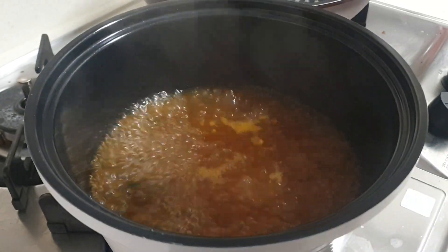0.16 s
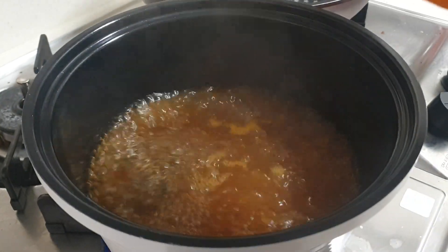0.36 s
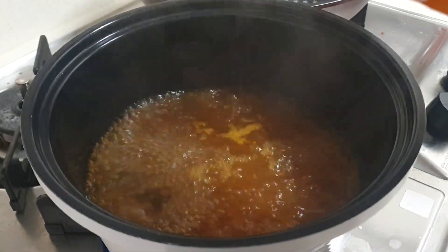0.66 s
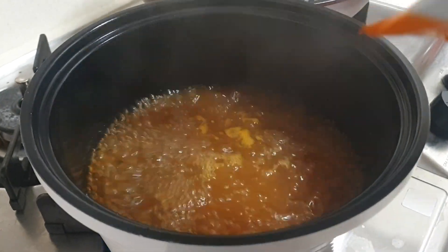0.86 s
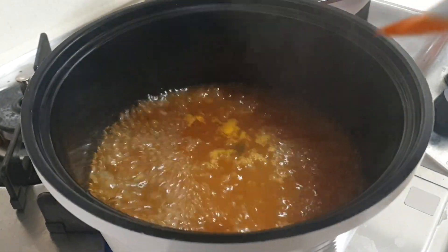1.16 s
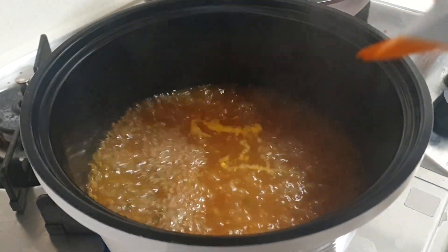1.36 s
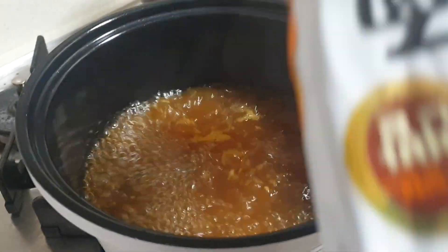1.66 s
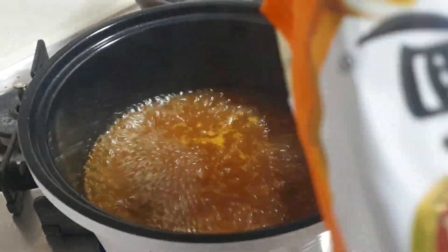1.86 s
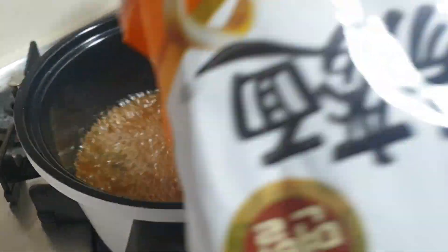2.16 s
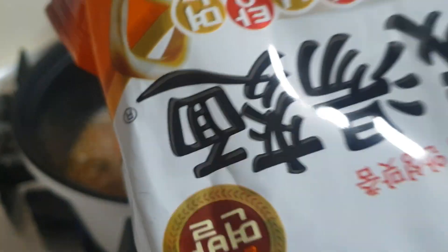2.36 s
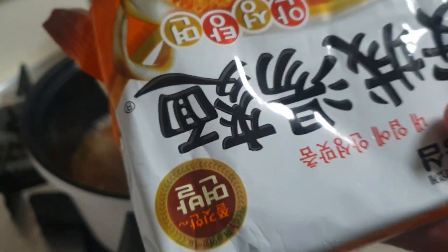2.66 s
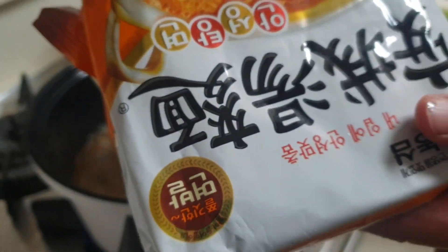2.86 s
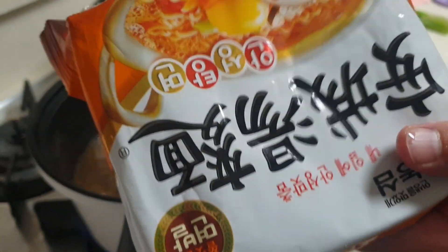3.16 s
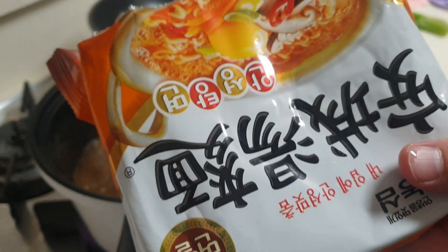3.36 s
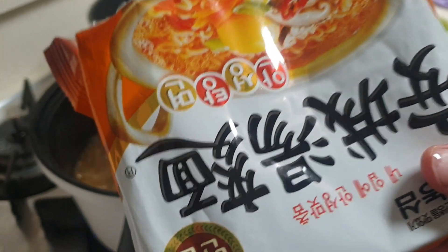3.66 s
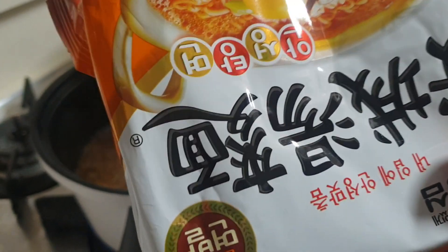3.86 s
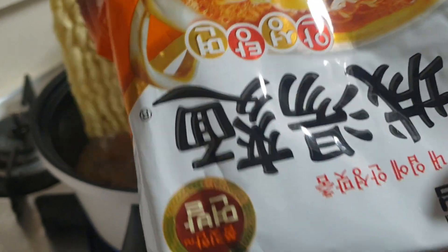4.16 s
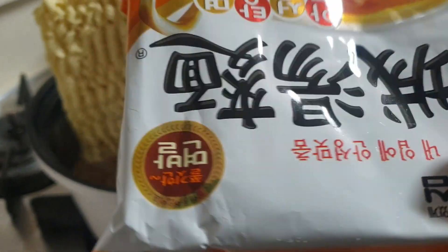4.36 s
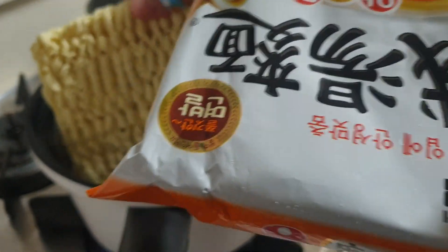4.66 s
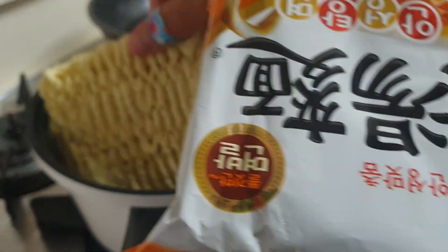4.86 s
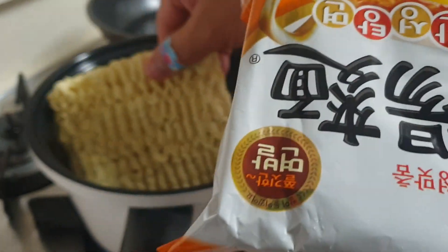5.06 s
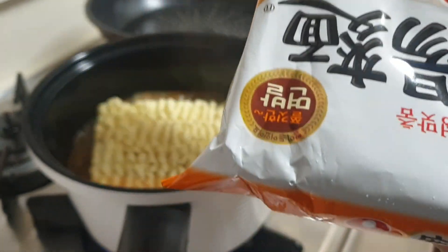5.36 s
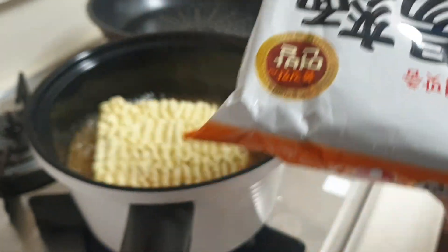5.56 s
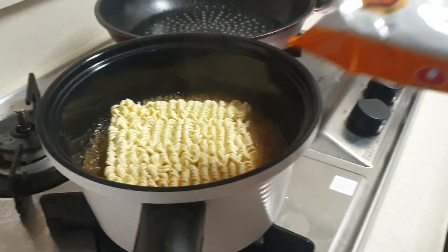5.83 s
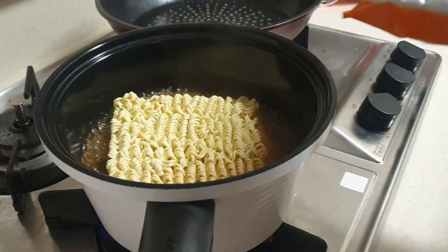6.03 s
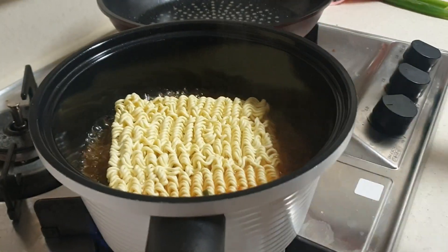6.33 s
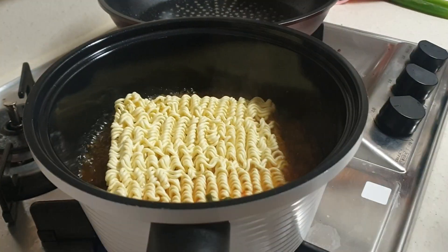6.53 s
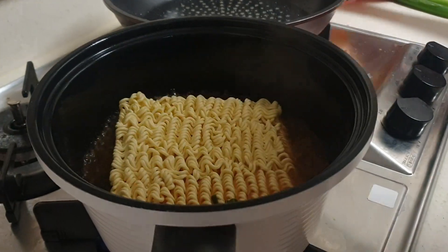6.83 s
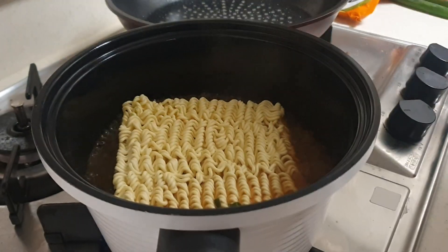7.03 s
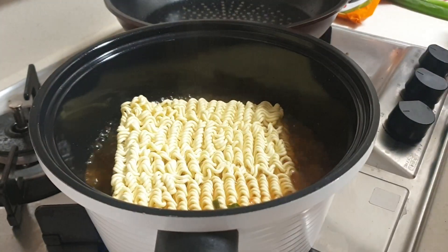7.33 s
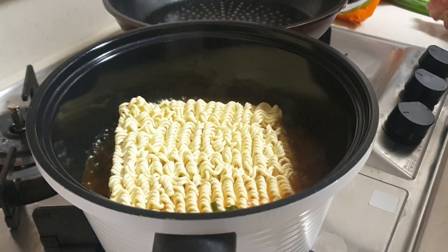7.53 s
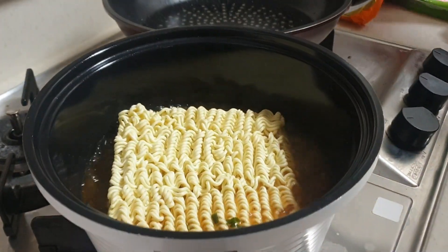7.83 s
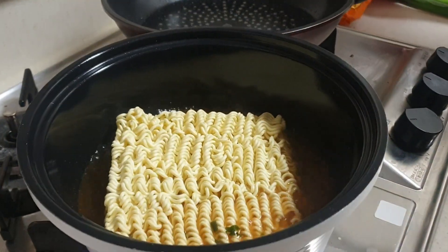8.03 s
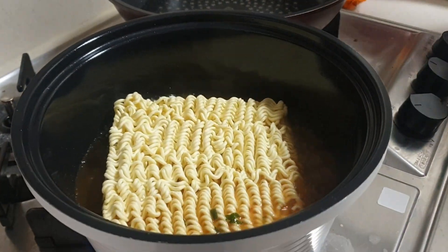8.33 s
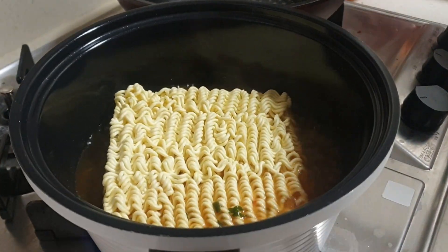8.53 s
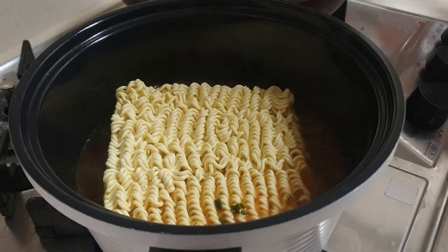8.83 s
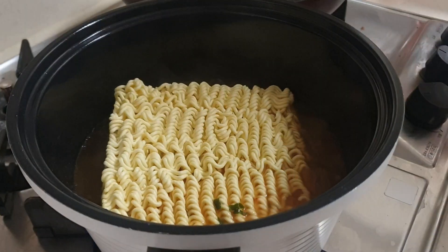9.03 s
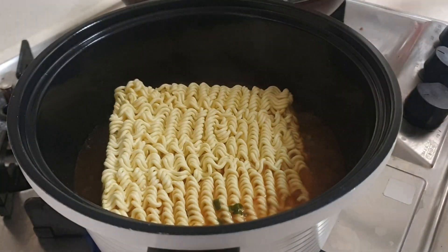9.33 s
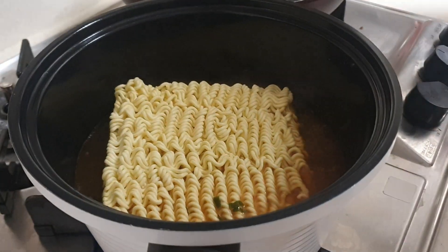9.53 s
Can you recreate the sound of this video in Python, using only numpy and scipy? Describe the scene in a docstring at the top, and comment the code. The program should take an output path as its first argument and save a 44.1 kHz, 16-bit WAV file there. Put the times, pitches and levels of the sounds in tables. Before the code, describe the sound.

A plastic noodle packet crinkles and snaps close up over simmering broth, then dry noodles drop into the pot with a soft scrape.

```python
"""A plastic noodle packet snaps, rustles and flexes as it is pulled open right at the microphone.
Behind it broth simmers over the rumble and hiss of a gas flame. The dry noodle block scrapes into
the pot and bubbles pop around it; then the packet is put down and handled further off on the worktop.
A small, hard kitchen rings after the packet and the pot."""
import sys
import numpy as np
from scipy import signal
from scipy.fft import rfft, irfft, next_fast_len
from scipy.io import wavfile
from scipy.ndimage import uniform_filter1d

SR = 44100
rng = np.random.default_rng(int(sys.argv[2]) if len(sys.argv) > 2 else 0)


def waveform_to_disk(signal):
    """Save audio, clipped to [-1, 1], as 16-bit WAV at the path in sys.argv[1]."""
    frames = np.transpose(np.atleast_2d(signal))
    scaled = np.clip(frames, -1, 1) * 32767
    samples = np.round(scaled).astype(np.int16)
    wavfile.write(sys.argv[1], SR, samples)


N = 427329
TIME = np.arange(N) / SR


def undb(db):
    """Decibels to gain."""
    return 10 ** (np.asarray(db) / 20)


def unit(x):
    """Scale to rms 1."""
    return x / np.sqrt(np.mean(x ** 2))


def band(x, lo_hz, hi_hz):
    """Causal band-pass."""
    sos = signal.butter(3, [lo_hz, min(hi_hz, .45 * SR)], "band", fs=SR, output="sos")
    return signal.sosfilt(sos, x)


def eq(x, points):
    """Filter by a curve of (frequency [Hz], gain [dB]) points."""
    hz, db = np.transpose(points)
    size = next_fast_len(N + 4096)
    bins_hz = np.maximum(np.fft.rfftfreq(size, 1 / SR), 1)
    gain = undb(np.interp(np.log(bins_hz), np.log(hz), db))
    return irfft(rfft(x, size) * gain, size)[..., :N]


def resonance(x, hz, q):
    """One resonance, gain 1 at its centre."""
    return signal.lfilter(*signal.iirpeak(min(hz, SR / 3), max(q, 1), fs=SR), x)


def mode_pole(hz, t60):
    """Pole of a mode that dies by 60 dB in t60 seconds."""
    return np.exp((2j * np.pi * hz - np.log(1000) / t60) / SR)


def add(out, s, x):
    """Mix x in at time s."""
    i = max(int(s * SR), 0)
    out[..., i:i + x.shape[-1]] += x[..., :N - i]


def pan(db):
    """Constant-power gains; every pan here is left minus right in dB."""
    return unit(undb([[db / 2], [-db / 2]]))


def stereo(three, likeness):
    """Left and right from one shared and two separate signals."""
    return np.sqrt(likeness) * three[0] + np.sqrt(1 - likeness) * three[1:]


def noise(samples, likeness):
    """Stereo white noise, from wide (likeness 0) to mono (1)."""
    return stereo(rng.standard_normal((3, samples)), likeness)


def drift(rate):
    """Random wander with a spread near 1 and `rate` turns a second."""
    knots = rng.standard_normal(int(N / SR * rate) + 2)
    return np.interp(TIME * rate, np.arange(len(knots)), knots)


def grains(rate, spread_db, decay_s):
    """Envelope of many tiny bursts: mostly weak, a few strong."""
    sizes = undb(spread_db * np.minimum(rng.exponential(size=N), 4.5))
    hits = (rng.random(N) < rate / SR) * sizes ** 2
    power = signal.lfilter([1], [1, -np.exp(-2 / (decay_s * SR))], hits)
    return unit(np.sqrt(power + 1e-12))


def registers(x):
    """Body, crack and sparkle of a crisp sound; body and brightness are set against the crack band."""
    return band(x, 330, 1500), band(x, 1500, 6000), band(x, 6000, 17000)


# Tone of the flame: (frequency [Hz], gain [dB])
FLAME_EQ = [(20, -23), (45, 6.5), (90, -0.5), (210, -8), (380, -16.5), (620, -15.5), (1000, -19.5),
            (1350, -25.5), (2200, -18.5), (3200, -34.5), (7000, -26), (10000, -24), (16000, -19)]
# Thin whistles of the gas jet: (frequency [Hz], level [dB])
JET_WHISTLES = [(8550, -72), (9950, -69.5)]
# Low hum: (frequency [Hz], starting level [dB])
LOW_HUM = [(44.8, -67.5)]

def stove(flame_db, hiss_pan_db, hum_rise_db_per_s):
    """The gas flame rumbles, hisses and faintly whistles over a low hum that wavers and grows."""
    flame = unit(eq(rng.standard_normal((3, N)), FLAME_EQ)) * undb(flame_db + .5 * drift(3.49))
    rumble = band(stereo(flame, 0.88), 35, 340)
    hiss = band(stereo(flame, 0.11), 410, 13200) * pan(hiss_pan_db)
    hum = whistle = 0
    for hz, db in LOW_HUM:
        swell = undb(db + hum_rise_db_per_s * TIME + 2 * drift(1.8))
        hum += np.sqrt(2) * swell * np.sin(2 * np.pi * hz * TIME + drift(1.7))
    for hz, db in JET_WHISTLES:
        whistle += undb(db + drift(2.16)) * unit(resonance(rng.standard_normal((2, N)), hz, q=64))
    return rumble + hiss + hum + whistle


# Reverb time of the kitchen: (frequency [Hz], t60 [s])
KITCHEN_DECAY = [(500, 0.27), (4000, 0.32), (16000, 0.21)]

def reflections(predelay_s):
    """Dense echoes off tiles and worktop, dying soonest in the top treble."""
    t = np.arange(SR // 2) / SR
    hz, t60 = np.transpose(KITCHEN_DECAY)
    edges_hz = np.geomspace(50, 18000, 10)
    tail = 0
    for lo, hi in zip(edges_hz, edges_hz[1:]):
        band_t60 = np.interp(np.log(lo * hi) / 2, np.log(hz), t60)
        wash = noise(len(t), likeness=1 / (1 + (lo / 600) ** 2))
        tail += band(wash, lo, hi) * np.exp(-np.log(1000) * t / band_t60)
    return unit(tail * np.clip(t / predelay_s - 1, 0, 1)) / np.sqrt(len(t))


def kitchen(x, predelay_s, sets):
    """Hands and microphone keep moving, so the sound passes through sets of reflections in turn."""
    active = (TIME * 10).astype(int) % sets
    room = 0
    for k in range(sets):
        crossfade = np.sqrt(np.abs(uniform_filter1d(1. * (active == k), SR // 20)) / 2)
        send = x.sum(axis=0) * crossfade
        room += signal.oaconvolve(send[None], reflections(predelay_s), axes=1)[:, :N]
    return room


# Tone of the fizz: (frequency [Hz], gain [dB])
FIZZ_EQ = [(400, 3), (900, -2.5), (2200, -1.5), (4000, -7), (7500, -13.5), (10200, 3.5), (13000, 1),
           (16000, -2)]
# Level of the simmer, swelling as the block goes in: (time [s], level [dB])
SIMMER_LEVEL = [(0, -46.5), (5.3, -67), (5.75, -55), (5.88, -43.5), (6.35, -55), (8.3, -56), (9.69, -51)]

def broth(rate, spread_db, bubble_db):
    """Tiny steam bubbles fizz at the hot wall; larger ones ring for a few cycles as they burst."""
    fizz = unit(eq(noise(N, 0.059) * grains(rate, spread_db, 0.0019), FIZZ_EQ))
    bubbles, t = np.zeros((2, N)), np.arange(SR // 50) / SR
    for when, pitch, strength in rng.random((700, 3)):
        cycles = 1100 * 5 ** pitch * t
        ping = np.sin(2 * np.pi * cycles) * np.exp(-cycles / 2)
        add(bubbles, when * N / SR, ping * undb(19 * strength ** 2))
    simmer_db = np.interp(TIME, *np.transpose(SIMMER_LEVEL))
    return (fizz + undb(bubble_db) * unit(bubbles)) * undb(simmer_db + drift(21))


def cracks(rows, crack_s, flutter_s, flutter_db, ring_db, span_s, likeness, stiffness, q):
    """A sharp release and a short flutter ring one facet; each level is an rms over span_s."""
    out, t = np.zeros((2, N)), np.arange(SR // 10) / SR
    jolt = undb(19.5) * (t == 0)
    for s, db, body_db, bright_db, facet_hz, pan_db in rows:
        ragged = undb(4.9 * np.interp(t, t[::50], rng.standard_normal(len(t[::50]))))
        # bright cracks come from small, stiff facets that hardly flutter
        flutter = undb(flutter_db - stiffness * bright_db) * ragged * np.exp(-t / flutter_s)
        burst = noise(len(t), likeness) * (np.exp(-t / crack_s) + flutter)
        ring = resonance(burst + jolt, facet_hz, q)
        # a facet radiates little far below its own pitch
        parts = registers(band(burst, facet_hz / 4, SR) + undb(ring_db) * ring)
        sound = sum(undb(part_db) * part / np.sqrt(np.sum(part ** 2) / (2 * span_s * SR))
                    for part, part_db in zip(parts, (body_db, 0, bright_db)))
        add(out, s, undb(db) * pan(pan_db) * sound)
    return out


def pitched(rows, base_hz=1680, db_per_octave=14.5):
    """Give each knock or pop a pitch that falls as its body grows."""
    rows = np.array(rows)
    return np.insert(rows, -1, base_hz * 2 ** (-rows[:, 2] / db_per_octave), axis=1)


# Bubble pops: (time [s], level [dB], body [dB], brightness [dB], pan [dB])
BUBBLE_POPS = [(5.7354, -52.5, -7, -15, 8), (5.8018, -60, 9.5, 9, 9), (5.8552, -58, 0, 12, -18),
               (6.1293, -48.5, -8.5, -2, -1)]

def pops():
    """Bubbles burst around the noodle block, each with a brief ring."""
    return cracks(pitched(BUBBLE_POPS), crack_s=0.00055, flutter_s=0.0054, flutter_db=1, ring_db=8,
                  span_s=0.013, likeness=0.21, stiffness=0.48, q=1.6)


# Ring of the filled pot: (frequency [Hz], level [dB], t60 [s])
POT_MODES = [(104, 5, 0.23), (167, 3, 0.054), (211, 3.5, 0.065), (534, -4, 0.027), (690, -9, 0.051)]
# The block meets the pot: (time [s], relative level [dB], rise [s], decay [s], relative scrape [dB])
BLOCK_TOUCHES = [(5.03, -53, 0.0016, 0.014, -46), (5.358, -37.5, .009, 0.016, 13.5)]

def noodle_block():
    """The dry block scrapes on the wall and shakes the pot; a soft touch wakes only the low modes."""
    out, t = np.zeros((2, N)), np.arange(SR // 2) / SR
    for s, db, rise_s, decay_s, scrape_db in BLOCK_TOUCHES:
        lead_s = 4 * rise_s
        since_peak = t - lead_s
        push = noise(len(t), 0.72) * np.exp(-np.maximum(-since_peak / rise_s, since_peak / decay_s))
        scrape = unit(band(push, 160, 4000) + undb(4.5) * band(push, 6100, 15000))
        sound = undb(scrape_db - 5.5) * scrape * pan(20)
        for hz, mode_db, t60 in POT_MODES:
            ring = signal.lfilter([1], [1, -mode_pole(hz, t60)], push).real
            hardness_db = scrape_db * np.clip(np.log(hz / 200) / 2, 0, 1)
            sound += undb(mode_db + hardness_db) * unit(ring)
        add(out, s - lead_s, undb(db - 8) * unit(sound))
    return out


def shifting_facets(x, depth_db, rate):
    """Facets of ever new sizes take over: each half octave swells and fades on its own."""
    size = next_fast_len(N)
    half_octave = 2 * np.log2(np.clip(np.fft.rfftfreq(size, 1 / SR) / 500, 1, 32))
    spectrum, out = rfft(x, size), 0
    for k in range(int(half_octave.max()) + 1):
        window = np.maximum(1 - abs(half_octave - k), 0)
        out += irfft(spectrum * window, size)[:, :N] * undb(depth_db * drift(rate))
    return out


# Film slides over film: (start [s], length [s], relative level [dB], brightness [dB])
FILM_PULLS = [(0.051, 0.073, -42.5, -7), (0.181, .11, -49, 3), (0.378, 0.032, -50, 3.5),
              (0.535, 0.17, -42, -0.5), (0.736, 0.16, -42, -0.5), (0.911, 0.16, -41.5, 6),
              (1.086, 0.11, -55.5, 11), (1.212, 0.076, -38, -1), (1.417, 0.063, -42, 0.5),
              (1.482, 0.046, -40.5, -2), (1.592, 0.094, -42, 2), (1.739, 0.29, -49.5, -0.5),
              (2.106, 0.091, -46, -2), (2.217, 0.2, -50.5, -4), (2.509, .34, -50, 5.5),
              (3.027, 0.047, -52.5, 3.5), (3.11, 0.048, -50.5, 3), (6.895, 0.053, -48, 2.5),
              (7.96, 0.033, -59, -5), (8.456, 0.093, -59, 2), (8.58, 0.029, -60, -13),
              (9.04, 0.077, -56.5, -10), (9.213, 0.027, -43, 1.5), (9.287, 0.021, -43.5, 3.5),
              (9.423, 0.039, -52.5, 0.5), (9.54, 0.12, -55.5, -2.5)]
PUT_DOWN_S, HAND_ATTACK_S = 6.4, 0.02
HAND_PULLS = [pull for pull in FILM_PULLS if pull[0] < PUT_DOWN_S]
WORKTOP_PULLS = [pull for pull in FILM_PULLS if pull[0] >= PUT_DOWN_S]

def pull_envelopes(pulls, attack_s, release_s=0.04):
    """Strength of crack and sparkle as the film takes up speed, holds and slides to rest."""
    crack, sparkle = np.full((2, N), 1e-14)
    t = np.arange(SR) / SR
    for s, length_s, db, bright_db in pulls:
        release = np.exp(-np.maximum(t - length_s, 0) / release_s)
        power = (undb(db) * np.clip(t / attack_s, 0, 1) * release) ** 2
        add(crack, s, power)
        add(sparkle, s, power * undb(bright_db) ** 2)
    return np.sqrt(crack), np.sqrt(sparkle)


def rustle(pulls, rate, spread_db, body_db, attack_s):
    """Countless small creases give way as the film slides."""
    crack, sparkle = pull_envelopes(pulls, attack_s)
    creases = noise(N, 0.08) * grains(rate, spread_db, 0.0033)
    parts = registers(shifting_facets(creases, depth_db=2, rate=65))
    return sum(unit(part) * gain for part, gain in zip(parts, (crack * undb(body_db), crack, sparkle)))


# Colour given to the packet's sounds: (frequency [Hz], gain [dB])
FILM_EQ = [(300, 3.5), (1500, 1.5), (2800, 3.5), (4500, 1), (7500, -2.5), (10000, 5), (13000, 3.5),
           (16000, -2)]

def film_tone(x):
    """Colours the packet's sounds, near or far."""
    return eq(x, FILM_EQ)


# Ring of the worktop: (frequency [Hz], gain [dB], t60 [s])
WORKTOP_MODES = [(560, 3, 0.031), (900, -3, 0.033), (1500, -6, 0.045)]

def worktop(knocks):
    """The worktop answers a knock with a few short, hollow modes."""
    out = 0
    for hz, db, t60 in WORKTOP_MODES:
        pole = mode_pole(hz, t60)
        out += undb(db) * 2 * (1 - abs(pole)) * signal.lfilter([1], [1, -pole], knocks).real
    return out


# Packet knocks, before EQ: (time [s], level [dB], body [dB], brightness [dB], pan [dB])
PACKET_KNOCKS = [(6.475, -57, -10, -8, 13), (6.9069, -56.5, 8.5, -7, 4), (6.9399, -34, -4.5, 7.5, 4),
                 (7.081, -45.5, -2.5, 1.5, -2), (7.4051, -47.5, -1, 1, -3), (7.4172, -53, 7.5, -10, 14),
                 (7.4722, -51, 5, 8.5, -8), (7.5422, -40, -1, -2, 13), (7.552, -44.5, 4, 2, 13),
                 (7.8696, -50, -6, 0, 0), (8.5855, -45.5, -1.5, -4, -5), (8.868, -58, -6, 6, 8),
                 (8.9807, -50, -5.5, 4, 1), (9.0322, -47.5, -4.5, 11.5, -3), (9.098, -51.5, -1.5, 5, 13),
                 (9.546, -46.5, -2.5, -2, -2)]

def packet_on_worktop():
    """Further off, the packet knocks on the worktop and rustles as it is handled."""
    knocks = cracks(pitched(PACKET_KNOCKS), crack_s=0.0061, flutter_s=0.0098, flutter_db=-16, ring_db=0,
                    span_s=0.0065, likeness=0.11, stiffness=0, q=1.55)
    slides = rustle(WORKTOP_PULLS, rate=1100, spread_db=4.5, body_db=-8, attack_s=0.022)
    return film_tone(knocks + worktop(knocks) + undb(-1) * slides)


# Whole panels flip over or meet the worktop: (time [s], level [dB], pitch [Hz])
PANEL_THUDS = [(0.078, -48.5, 120), (0.247, -53, 169), (0.762, -46.5, 125), (0.845, -45, 199),
               (1.003, -51.5, 198), (1.233, -47.5, 190), (1.269, -49, 120), (1.288, -47, 99),
               (2.113, -52, 210), (2.334, -51.5, 327), (6.94, -51.5, 300), (7.404, -54, 110),
               (7.545, -53.5, 260)]

def panel_flexes(pulls, decay_s, sway_db):
    """Large panels push air in soft thuds, and keep swaying while the film is worked."""
    thuds, t = np.zeros((2, N)), np.arange(SR // 6) / SR
    for s, db, hz in PANEL_THUDS:
        thud = band(noise(len(t), 0.73) * np.exp(-t / decay_s), hz / 1.9, hz * 1.77)
        add(thuds, s, undb(db) * unit(thud))
    sway = unit(band(noise(N, 0.48) * grains(70, 2.3, 0.0039), 55, 274))
    effort, _ = pull_envelopes(pulls, HAND_ATTACK_S)
    return thuds + sway * np.sqrt(effort) * undb(sway_db)


# Squeaks: (time [s], length [s], start pitch [Hz], end pitch [Hz], level [dB], roughness [0-1])
FILM_SQUEAKS = [(1.165, .032, 10800, 11900, -35, .02), (.89, .065, 670, 650, -42, .06)]

def squeaks():
    """Taut film slips in short, unsteady tones."""
    out = np.zeros((2, N))
    for s, length_s, start_hz, end_hz, db, rough in FILM_SQUEAKS:
        progress = np.linspace(0, 1, int(length_s * SR))
        jitter = unit(uniform_filter1d(rng.standard_normal(len(progress)), 40))
        hz = (start_hz + (end_hz - start_hz) * progress) * (1 + rough * jitter)
        add(out, s, undb(db) * np.sin(np.pi * progress) * np.sin(2 * np.pi * np.cumsum(hz) / SR))
    return out


def crinkles(pulls, count, spread_db, offset_db):
    """Stray small cracks, each with its own colour, as strong as its pull; rows as in FILM_SNAPS."""
    s, length_s, db, bright_db = np.transpose(pulls)
    moment, strength, size, sheen, turn = rng.random((count, 5)).T
    # longer pulls get more cracks
    pull = np.searchsorted(np.cumsum(length_s) / length_s.sum(), (np.arange(count) + turn) / count)
    when = s[pull] + HAND_ATTACK_S / 2 + moment * length_s[pull]
    level_db = db[pull] + offset_db + spread_db * strength ** 2
    body_db, facet_hz = -14 * (1 - size), 4500 * 2 ** (-2 * size)
    return np.column_stack([when, level_db, body_db, bright_db[pull] + 10 * (sheen - .5), facet_hz])


# Where the packet is held: (time [s], pan [dB])
HAND_PAN = [(0, -8), (1.3, -4), (1.5, -0.5), (2.1, 3.5), (2.6, 2.5), (3.4, 2), (4.5, 0), (6.2, -2.5)]

def panned(rows, scatter_db):
    """Give each crack a pan, scattered around where the packet is held."""
    held_db = np.interp(rows[:, 0], *np.transpose(HAND_PAN))
    return np.column_stack([rows, held_db + scatter_db * rng.standard_normal(len(rows))])


# Close snaps, before EQ: (time [s], level [dB], body [dB], brightness [dB], facet pitch [Hz])
FILM_SNAPS = [(0.0786, -30.5, -4.5, -1, 1910), (0.1045, -31.5, -2, 0, 1290), (0.1433, -32, -11, 0, 2300),
              (0.2479, -34, -2, 0.5, 900), (0.293, -39, -9, 3.5, 3570), (0.354, -39, 0, -4.5, 1080),
              (0.3976, -39, 1, 4, 900), (0.5857, -30, -10, 8.5, 5630), (0.6572, -41.5, -9, 2, 2500),
              (0.731, -34.5, -1.5, 7.5, 3730), (0.7625, -32, -2.5, 6, 3200), (0.847, -35, -9, -4, 2980),
              (0.8612, -32, -4.5, 2, 2300), (1.065, -29, -11.5, -11, 2730), (1.1603, -32, -26, 7, 4300),
              (1.25, -28.5, -6.5, 0.5, 3040), (1.272, -39.5, 7.5, 10.5, 613), (1.289, -31, -9, 0, 2280),
              (1.3743, -34, -2, 2.5, 710), (1.4854, -32, -4, 6, 2800), (1.612, -46, -12, 16.5, 8800),
              (1.658, -32.5, -6, -6, 1830), (1.671, -35, -7, 4, 1810), (1.7232, -40.5, -0.5, 3.5, 1160),
              (1.8319, -37, -8, 1.5, 1950), (1.863, -44, -9, -1, 3010), (1.909, -33.5, -16, 2, 3420),
              (2.081, -51.5, 9, -13, 1180), (2.1161, -37.5, -4, 2.5, 4700), (2.264, -46.5, -3, -6, 1300),
              (2.2912, -45, 7, -1, 1000), (2.3076, -42.5, -11, -2, 2430), (2.335, -51.5, 8.5, -1, 413),
              (2.4888, -34, -4.5, -1.5, 2020), (2.511, -37, -10, 3, 1790), (2.558, -29, -14, -3.5, 2330),
              (2.566, -33.5, -15, 2.5, 2300), (2.5837, -33, -5, -11, 2220), (2.6353, -36.5, -9, 2, 3600),
              (2.6958, -37, -9.5, 4, 3600), (2.746, -36.5, -14, 3, 3360), (2.809, -39, -7, 0, 2300),
              (2.8858, -44, -5, -0.5, 1400), (3.004, -47.5, -4, -2, 1500), (3.244, -38, -9, 2.5, 2520),
              (3.715, -49.5, -4.5, 3.5, 840), (4.2894, -42.5, -6.5, 1, 2470), (4.424, -37.5, -10, 2, 2600),
              (4.4654, -42, -4, -7, 2450), (4.602, -54.5, 4.5, 1.5, 755), (6.1839, -41, -12, 11.5, 9700)]

def packet_in_hand():
    """Pulled open at the microphone, the film buckles in sharp snaps over its own rustle."""
    strays = crinkles(HAND_PULLS, count=90, spread_db=10, offset_db=-1.5)
    buckles = panned(np.vstack([FILM_SNAPS, strays]), scatter_db=6.5)
    snaps = cracks(buckles, crack_s=0.00012, flutter_s=0.0066, flutter_db=-3, ring_db=-2,
                   span_s=0.0079, likeness=0.18, stiffness=0.25, q=3.4)
    slides = rustle(HAND_PULLS, rate=750, spread_db=2.5, body_db=-7.5, attack_s=HAND_ATTACK_S)
    return film_tone(snaps + undb(-1.5) * slides)


def scene():
    """Packet and pot over the stove bed; the far packet gets the most reverb, the near one the least."""
    near = packet_in_hand() + panel_flexes(HAND_PULLS, decay_s=0.01, sway_db=-30) + squeaks()
    far = packet_on_worktop()
    pot = pops() + noodle_block() + broth(rate=1200, spread_db=4.5, bubble_db=-24.5)
    send = undb(-7.5) * near + undb(0.5) * far + undb(-4.5) * pot
    room = kitchen(send, predelay_s=0.00042, sets=5)
    return near + far + pot + room + stove(flame_db=-52, hiss_pan_db=11, hum_rise_db_per_s=1)


# Shadow of the phone's body: (frequency [Hz], left boost and right cut [dB])
PHONE_SHADOW = [(180, 1.5), (900, 3), (5000, 3.5), (12000, 1.5)]

def record(dry):
    """The right microphone port lies in the phone's shadow; the top treble is cut."""
    left = eq(dry[0], PHONE_SHADOW)
    right = eq(dry[1], [(hz, -db) for hz, db in PHONE_SHADOW])
    high_cut = signal.ellip(10, .2, 70, 15900, fs=SR, output="sos")
    return signal.sosfilt(high_cut, [left, right])


dry = scene()
out = record(dry)
waveform_to_disk(out)
```